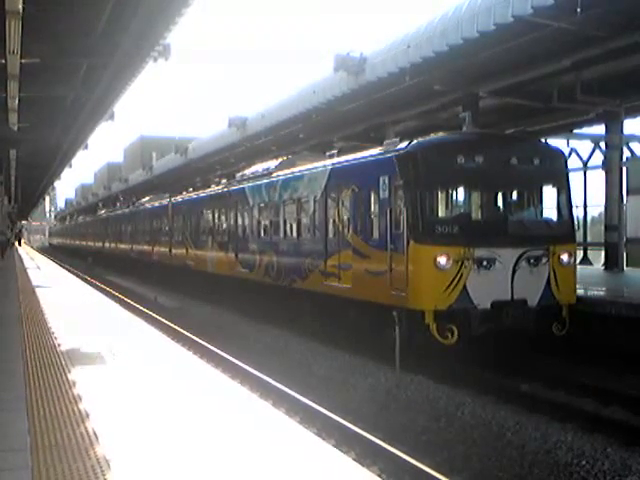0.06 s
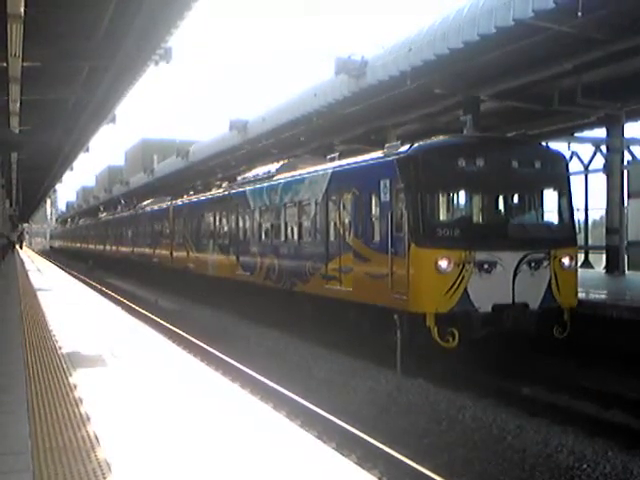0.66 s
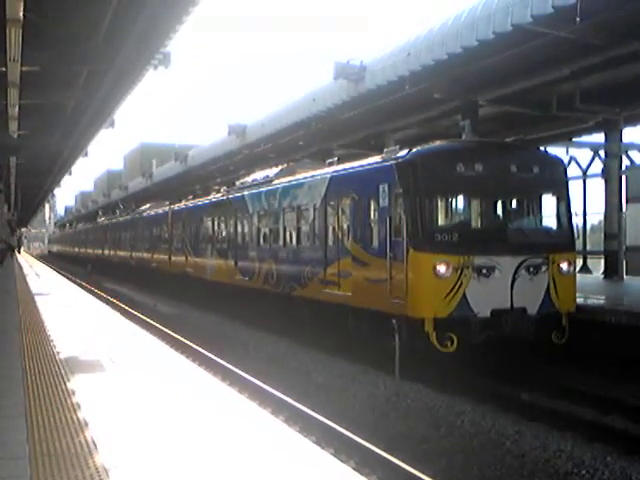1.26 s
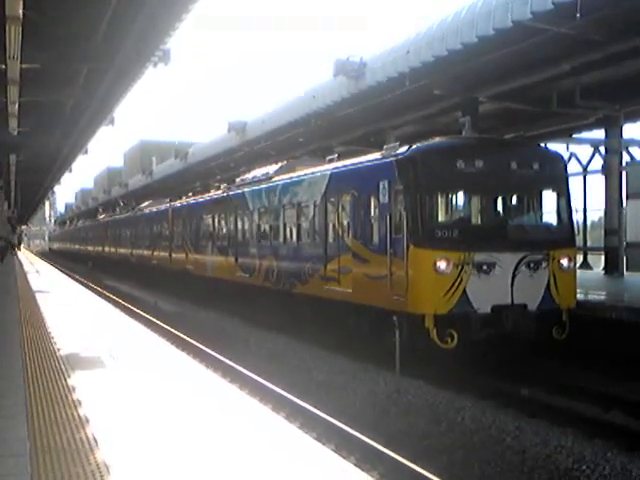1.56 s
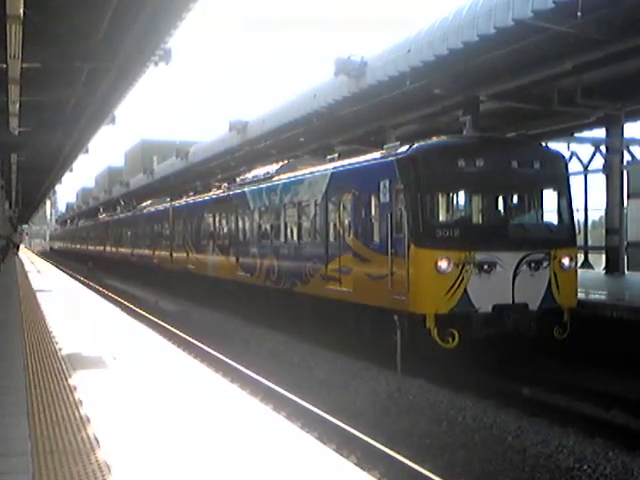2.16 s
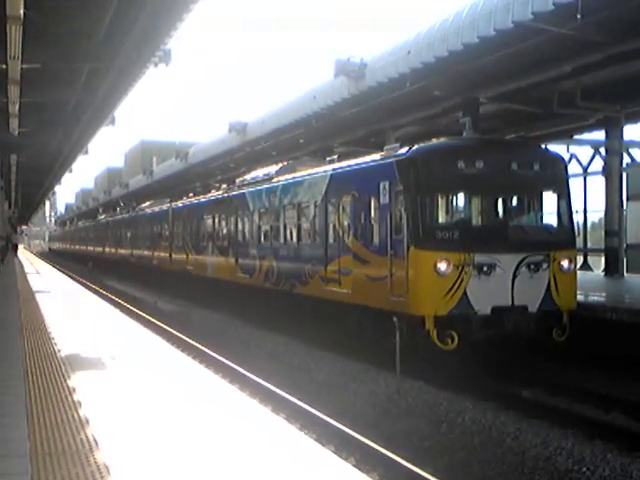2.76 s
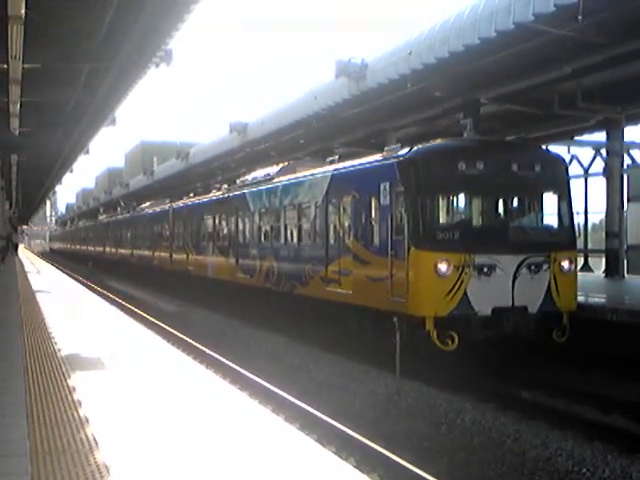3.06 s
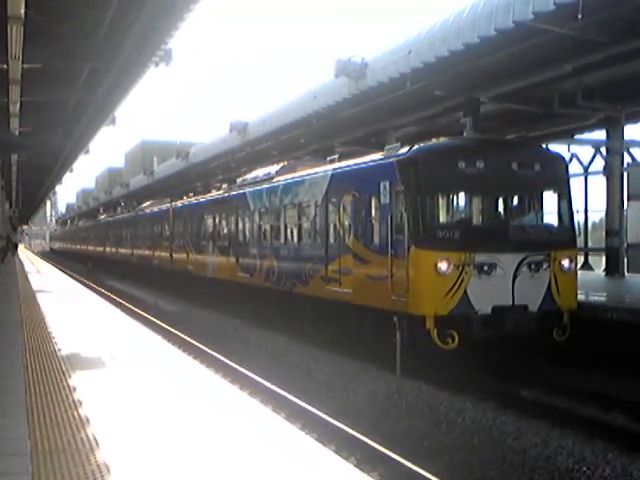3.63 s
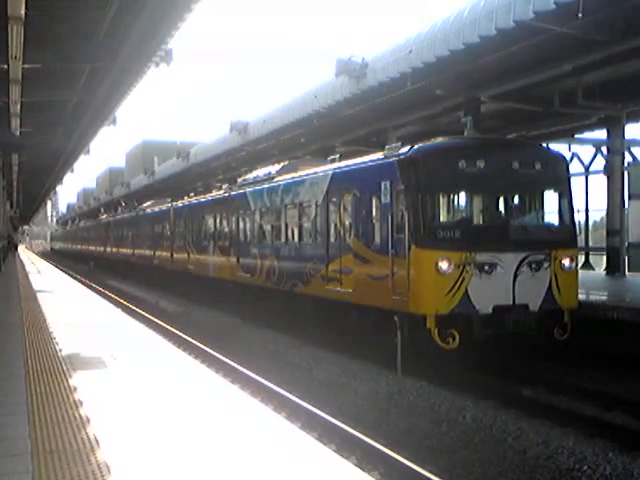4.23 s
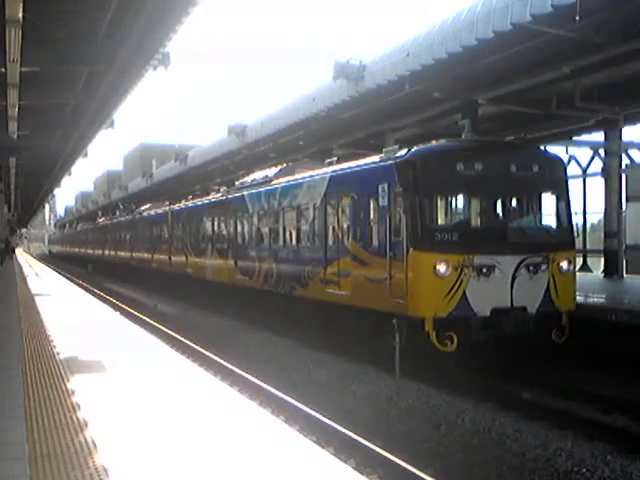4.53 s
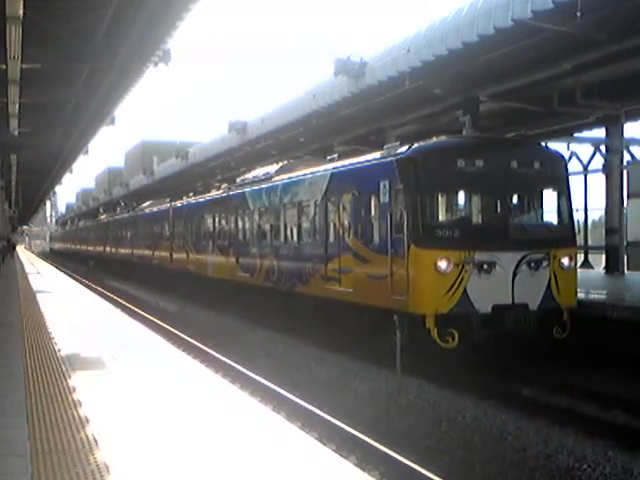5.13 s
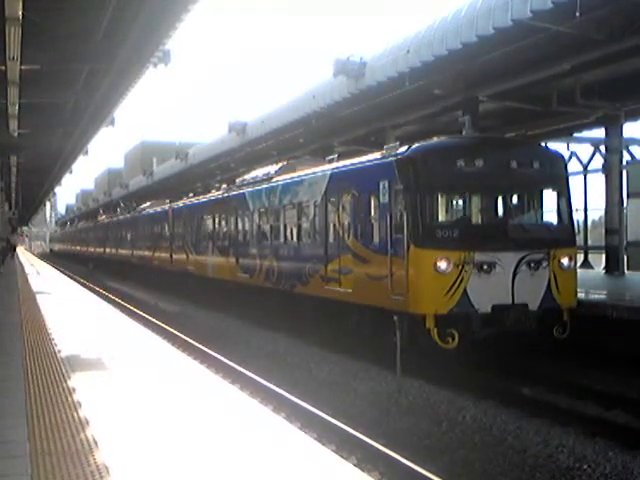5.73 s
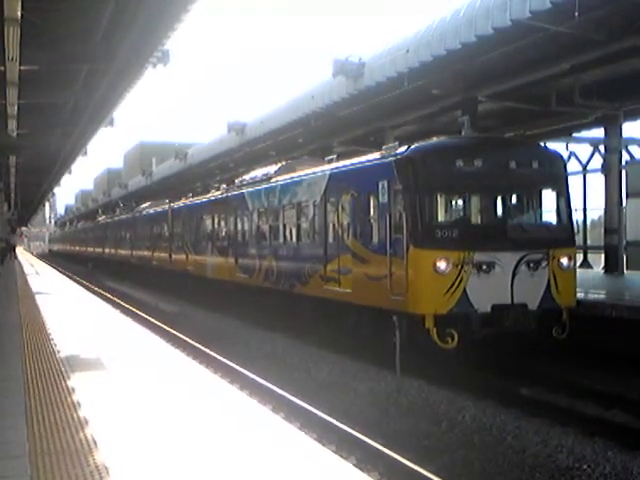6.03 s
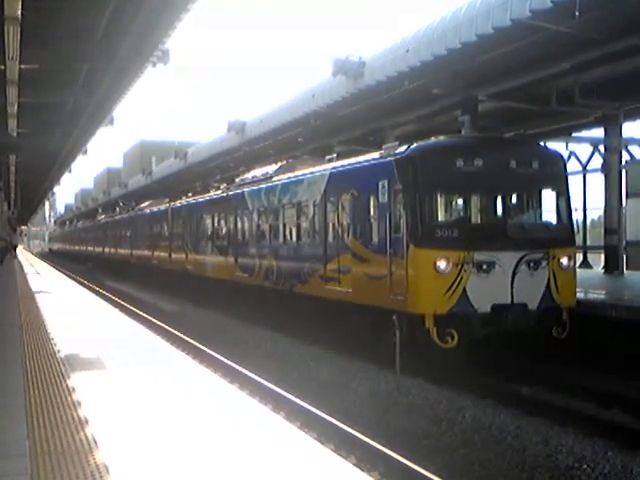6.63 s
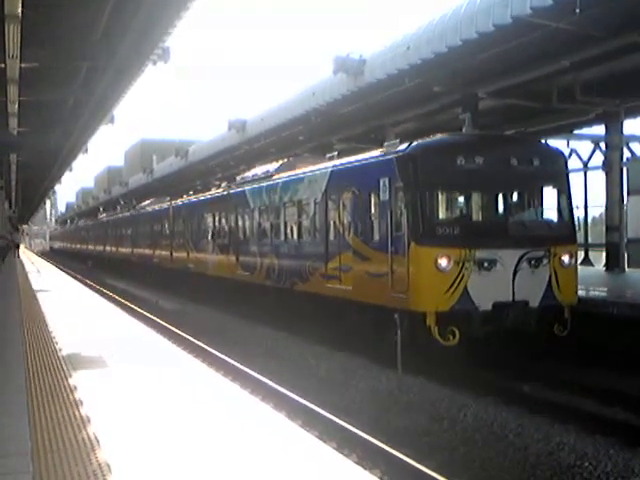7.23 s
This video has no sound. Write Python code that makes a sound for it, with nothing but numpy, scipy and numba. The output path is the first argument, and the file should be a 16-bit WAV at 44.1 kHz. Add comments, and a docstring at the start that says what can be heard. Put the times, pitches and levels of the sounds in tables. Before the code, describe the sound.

Steady fan rush and thin electrical tones from an idling train, joined halfway by gusts thumping and crackling on the microphone.

```python
"""Cooling fans roar and converters whine faintly: an electric train stands at a roofed platform.
The fans give broadband flow noise, the converters thin tones that waver in the moving air.
From about four seconds on, turbulent wind buffets a small camera's microphone with dull knocks.
The hardest buffets overflow its narrow-band recorder into sharp crackles, and its gain control
ducks the train."""
import sys
import numpy as np
from scipy import signal
from scipy.fft import rfft, irfft
from scipy.io import wavfile
from scipy.ndimage import uniform_filter1d
from numba import njit

SR = 44100
rng = np.random.default_rng(int(sys.argv[2]) if len(sys.argv) > 2 else 0)


def transcribe(signal):
    """Save signal, clipped to [-1, 1], as a 16-bit WAV file at the path in sys.argv[1]."""
    frames = np.atleast_2d(signal).T
    limited = np.clip(frames, -1, 1)
    pcm = np.round(limited * 32767).astype(np.int16)
    wavfile.write(sys.argv[1], SR, pcm)


N = 321204
T = np.arange(N) / SR
FREQUENCIES = np.fft.rfftfreq(N, 1 / SR)


def gain_of(db):
    """The decibel scale: amplitude grows tenfold every 20 dB."""
    return 10 ** (np.asarray(db) / 20)


def unit_rms(x):
    """Normalisation to an rms of 1."""
    return x / np.sqrt(np.mean(x ** 2) + 1e-20)


def curve(rows):
    """Linear interpolation in time between (t/s, value) rows."""
    return np.interp(T, *np.transpose(rows))


def noise(spectrum):
    """Spectral shaping: white noise takes the colour of (f/Hz, level/dB) rows, at rms 1."""
    hz, db = np.transpose(spectrum)
    colour = gain_of(np.interp(np.log(FREQUENCIES + 1), np.log(hz + 1), db))
    return unit_rms(irfft(rfft(rng.standard_normal(N)) * colour, N))


def drift(cutoff_hz):
    """Random modulation: low-passed noise of zero mean and rms 1."""
    low_pass = (FREQUENCIES > 0) / (1 + (FREQUENCIES / cutoff_hz) ** 4)
    return unit_rms(irfft(rfft(rng.standard_normal(N)) * low_pass, N))


# Spectrum of the fans under the platform roof: f/Hz, relative level/dB
FAN_SPECTRUM = [(40, -47), (85, -32), (130, -23), (160, -19), (185, -11.5), (230, -4), (290, -2), (350, -1),
                (460, -3), (530, -7), (720, -8), (900, -12), (1150, -11.5), (1500, -14), (3300, -13)]
# Slow swell of the fans: t/s, relative level/dB
FAN_SWELL = [(0, -0.5), (1.7, -0.9), (3.2, -0.5), (3.4, 0.7), (4.1, -1), (6.7, 1.45), (7.28, 0)]
# Spectrum of the midrange that comes and goes in their rush: f/Hz, relative level/dB
MIDRANGE_SPECTRUM = [(400, -31.5), (750, -5), (1050, -0.5), (1300, 0.5), (1700, -13.5), (2600, -35.5)]
# Envelope of that midrange: t/s, level/dB
MIDRANGE_ENVELOPE = [(0, -35.5), (.6, -43), (1, -32), (1.5, -47), (3.1, -47), (3.5, -42), (4, -49.5),
                     (6.65, -49), (6.79, -22.5), (6.9, -56), (7.28, -40)]
def fans(level_db=-17, flutter_db=.5):
    """Broadband flow noise: cooling air rushes steadily, its midrange swelling now and then."""
    rush = noise(FAN_SPECTRUM) * gain_of(level_db + curve(FAN_SWELL) + flutter_db * drift(9.8))
    midrange = noise(MIDRANGE_SPECTRUM) * gain_of(curve(MIDRANGE_ENVELOPE))
    return rush + midrange


# Electrical tones of the converters: f/Hz, rms level/dB
CONVERTER_TONES = [(349.9, -39), (1003, -54), (2181, -44.5), (2424, -50.5), (2881, -55)]
def converters(fade_db=2.5, waver_hz=1.77):
    """Multipath fading: thin tones waver and fade as their reflections shift in the moving air."""
    out = np.zeros(N)
    for hz, db in CONVERTER_TONES:
        cycles = np.cumsum(hz + waver_hz * drift(3.4)) / SR
        fading = gain_of(fade_db * drift(1.2))
        out += gain_of(db) * unit_rms(np.sin(2 * np.pi * cycles) * fading)
    return out


def pulse(u, rise=1, fall=1.5):
    """An asymmetric Gaussian envelope peaking at u = 0; the default widths are those of a gust."""
    return np.exp(-(u / np.where(u < 0, rise, fall)) ** 2)


# Spectrum of fine turbulence at the microphone: f/Hz, relative level/dB
TURBULENCE_SPECTRUM = [(30, -43), (70, -38), (120, -14), (200, -5.5), (290, 3), (420, -15), (700, -20.5),
                       (1200, -34), (2500, -55)]
# Light air between the gusts: t/s, level/dB
AIR_ENVELOPE = [(0, -48), (4.05, -42), (4.3, -28.5), (5.6, -34.5), (6.62, -29), (6.9, -31), (7.28, -36)]
# Gusts passing the microphone: peak t/s, relative level/dB, rise time/s, eddy f/Hz
PASSING_GUSTS = [ (4.359, -33, 0.13, 220), (4.536, -23, .11, 260), (4.817, -27, 0.034, 376),
                 (4.951, -28.5, 0.04, 234), (5.391, -40, 0.11, 334), (5.675, -27.5, .03, 320),
                 (5.762, -16.5, 0.065, 380), (6.003, -16.5, 0.035, 335), (6.142, -19, 0.04, 460),
                 (6.249, -19.5, 0.021, 312), (6.349, -22.5, 0.027, 280), (6.43, -14, .022, 330),
                 (6.493, -13, 0.039, 570), (6.858, -28.5, 0.028, 282), (7.043, -34.5, 0.034, 377),
                 (7.228, -29.5, 0.066, 360)]
def turbulence(lumpy_db=3, gust_gain_db=6.0):
    """Incoherent addition: the finest eddies of light air and gusts sum in power to a lumpy rumble."""
    power = gain_of(curve(AIR_ENVELOPE)) ** 2
    for peak_s, db, rise_s, _ in PASSING_GUSTS:
        near = abs(T - peak_s) < 3 * rise_s
        power[near] += (gain_of(db + gust_gain_db) * pulse((T[near] - peak_s) / rise_s)) ** 2
    rumble = noise(TURBULENCE_SPECTRUM) * gain_of(lumpy_db * np.tanh(drift(41)))
    return np.sqrt(power) * unit_rms(rumble)


def small_eddies(count=8, above_gust_db=10.5, scatter_db=8, scatter_octaves=.43, width_cycles=.99):
    """Eddy shedding: each gust carries a loose train, as rows of t/s, level/dB, f/Hz, width/s."""
    rows = []
    for peak_s, db, rise_s, hz in PASSING_GUSTS:
        jitter, strength, detuning = rng.uniform(-1.024, 1, (count, 3)).T
        offset = (2 * np.arange(count) + 1 + jitter) / count - 1  # in rise times from the peak
        eddy_db = db + 20 * np.log10(pulse(offset)) + above_gust_db + scatter_db * strength
        eddy_hz = hz * 2 ** (scatter_octaves * detuning)
        rows += zip(peak_s + offset * rise_s, eddy_db, eddy_hz, width_cycles / eddy_hz)
    return rows


def strike(air, eddies, steepening=.088, reach_s=.03):
    """Pressure follows the change of flow: each eddy swings the diaphragm and displaces finer ones."""
    swings, undisturbed = np.zeros(N), np.ones(N)
    for peak_s, db, hz, width_s in eddies:
        near = slice(*np.searchsorted(T, [min(peak_s, T[-1]) - reach_s, peak_s + reach_s]))
        t = T[near] - peak_s
        push = pulse(t / width_s, rise=.55, fall=.68)
        phase = 2 * np.pi * hz * t
        # a second harmonic steepens one flank of the swing and roughens the thump
        flow = push * (np.sin(phase) + steepening * push * np.cos(2 * phase))
        swings[near] += gain_of(db) * np.gradient(flow, phase)
        undisturbed[near] *= 1 - push
    return swings + undisturbed * air


# Large eddies that knock on the microphone: t/s, level/dB, f/Hz, width/s
LARGE_EDDIES = [ (4.364, -8.5, 268, 0.0044), (4.453, -11, 322, 0.0045), (4.482, -13, 290, 0.0095),
                (4.52, -11, 320, 0.012), (4.529, -2.5, 297, 0.0034), (4.557, -13, 288, 0.011),
                (4.605, -3, 282, 0.0062), (4.621, -10.5, 290, 0.014), (4.705, -7.5, 480, 0.0029),
                (4.796, -3.5, 420, 0.0031), (4.825, -5, 348, 0.0037), (4.926, -7, 326, 0.0039),
                (4.931, -10, 338, 0.0055), (5.322, -10, 336, 0.0027), (5.362, -14, 342, 0.0056),
                (5.418, -10.5, 330, 0.004), (5.478, -13.5, 350, 0.0052), (5.622, -8.5, 306, 0.0027),
                (5.6971, 8.5, 280, .0026), (5.7007, 12, 280, .0034), (5.729, -3.5, 367, 0.0046),
                (5.759, -1.5, 450, 0.0064), (5.765, -7, 346, 0.005), (5.792, -4, 380, 0.0067),
                (5.833, -6.5, 335, 0.0056), (5.944, -1, 313, 0.0038), (5.994, -4, 310, .004),
                (6.0044, 4, 450, .0026), (6.111, 3.8, 380, .0023), (6.12, 0, 320, 0.0048),
                (6.126, -6.5, 398, 0.0064), (6.149, -3, 560, 0.0021), (6.156, -4.5, 400, 0.0053),
                (6.19, -2.5, 320, .0065), (6.201, .3, 280, .01), (6.245, -2.5, 325, 0.003),
                (6.266, -8.5, 310, 0.0025), (6.328, -9, 280, 0.0059), (6.341, -6, 292, 0.0058),
                (6.373, -7.5, 318, 0.0045), (6.4062, 4.3, 400, .0022), (6.4133, 8.9, 205, .0029),
                (6.4205, 1, 460, .0028), (6.426, 5, 309, .007), (6.45, 1.2, 480, .003),
                (6.4725, 10, 330, .0025), (6.4747, 12, 540, .002), (6.482, 6, 440, .0024),
                (6.487, 5, 517, 0.0013), (6.494, -3.5, 418, 0.0021), (6.511, 2, 438, 0.0033),
                (6.516, 4, 480, 0.0012), (6.544, -3, 560, 0.0024), (6.554, 1, 386, 0.0036),
                (6.851, -5, 259, 0.0046), (6.855, -21, 348, 0.0055), (7.031, -3, 347, 0.0032),
                (7.042, -6, 358, 0.0028), (7.076, -12, 360, 0.0057), (7.201, -7, 308, 0.0071),
                (7.231, -8.5, 347, 0.0044), (7.266, -9.5, 376, 0.0041)]
def wind(low_cut_hz=92):
    """Turbulent pressure fluctuation: fine eddies flutter on the microphone, large ones break through."""
    flutter = strike(turbulence(), small_eddies())
    # the microphone barely follows slow flutter
    low_cut = signal.butter(2, low_cut_hz, "high", fs=SR, output="sos")
    return strike(signal.sosfilt(low_cut, flutter), LARGE_EDDIES)


@njit
def gain_control(x, threshold=.42, attack_db_per_s=2400, recovery_db_per_s=26, lag_s=.004):
    """Negative feedback: gain falls with the saturated output's excess over threshold, then creeps back."""
    out, target_db, duck_db = np.empty_like(x), 0., 0.
    for i in range(len(x)):
        out[i] = x[i] * 10 ** (-duck_db / 20)
        excess = max(min(abs(out[i]), 1.) - threshold, 0.)
        target_db = max(target_db + (attack_db_per_s * excess - recovery_db_per_s) / SR, 0.)
        duck_db += (target_db - duck_db) / (lag_s * SR)
    return out


RECORDER_HZ = 8000  # sampling rate
def overflow(x, drive, crack_above=1.2, chatter_above=1.8, chatter_hz=3620):
    """Wraparound past full scale (1): a sample flips sign on each overdriven crest; the hardest chatter."""
    crest = (drive > crack_above) & (drive > np.roll(drive, 1)) & (drive > np.roll(drive, -1))
    step = chatter_hz / RECORDER_HZ
    chatter = np.arange(len(drive)) * step % 1 < step
    wrapped = np.where(drive > chatter_above, chatter, crest)
    return np.where(wrapped, -x, x)


def playback(x, ceiling=.97, knee=24, top_hz=15600):
    """Reconstruction: a gentle interpolation filter lets a faint mirror image through above the band."""
    interpolator = signal.firwin(14 * 441 + 1, 3920, window=("kaiser", 8), fs=RECORDER_HZ * 441)
    x = signal.resample_poly(x, SR, RECORDER_HZ, window=interpolator)[:N]
    # the cracks overshoot and flatten just under full scale, which spreads them into the treble
    x = ceiling * x / (1 + abs(x) ** knee) ** (1 / knee)
    return signal.oaconvolve(x, signal.firwin(511, top_hz, window=("kaiser", 9), fs=SR), "same")


def scene():
    """Superposition: the train and the wind add at one microphone."""
    return (fans() + converters() + wind())[None]


def record(dry, band_hz=3440, hiss_db=-17.0):
    """Overload distortion: the sound is ducked, clipped, band-limited and wrapped, then played back."""
    ducked = gain_control(dry[0])
    drive = abs(signal.resample_poly(ducked, RECORDER_HZ, SR))
    clipped = np.clip(ducked, -1, 1)
    narrow = signal.oaconvolve(clipped, signal.firwin(401, band_hz, fs=SR), "same")
    sampled = signal.resample_poly(narrow, RECORDER_HZ, SR, window=("kaiser", 7))
    cracked = overflow(sampled, drive)
    # modulation noise: a faint hiss follows the waveform's mean slope
    slope = uniform_filter1d(abs(np.diff(cracked, prepend=0)), size=64)
    hiss = gain_of(hiss_db) * slope * rng.standard_normal(len(cracked))
    return playback(cracked + hiss)[None]


dry = scene()
out = record(dry)
transcribe(out)
```